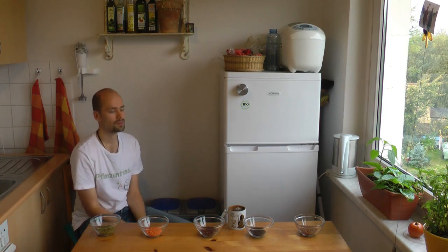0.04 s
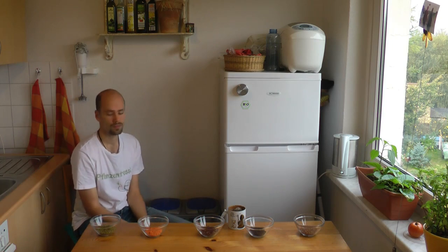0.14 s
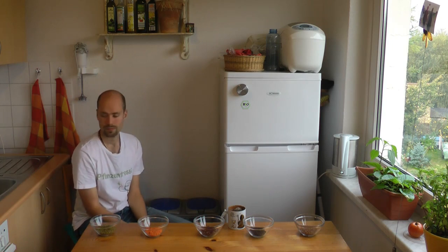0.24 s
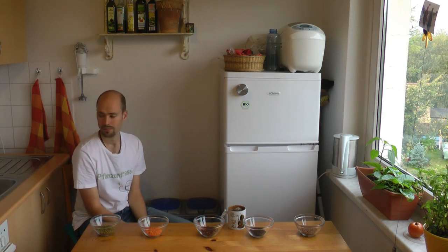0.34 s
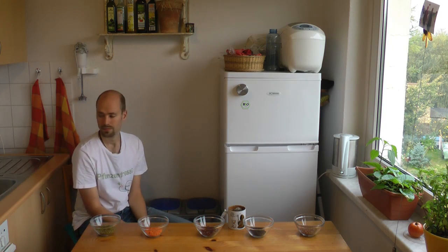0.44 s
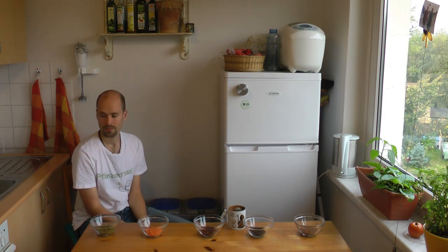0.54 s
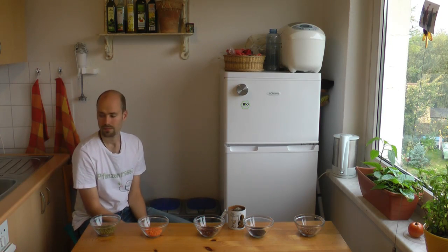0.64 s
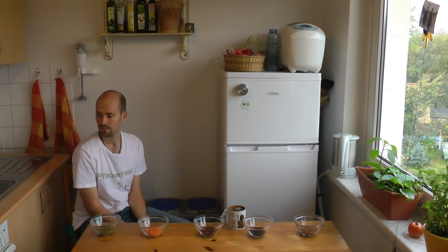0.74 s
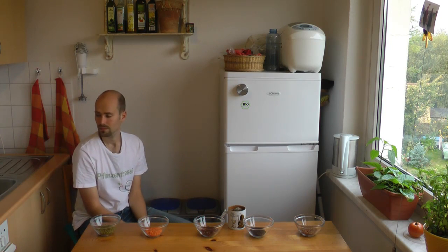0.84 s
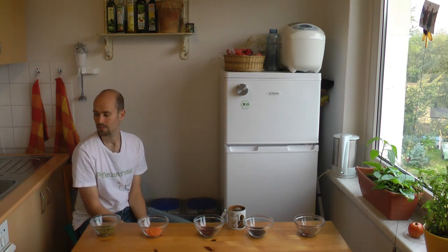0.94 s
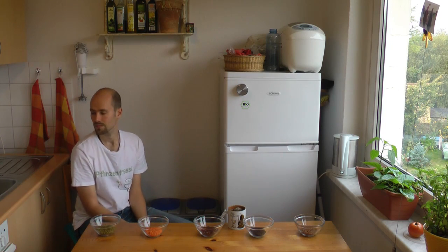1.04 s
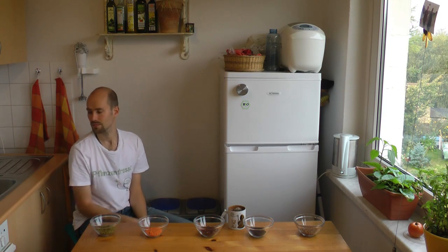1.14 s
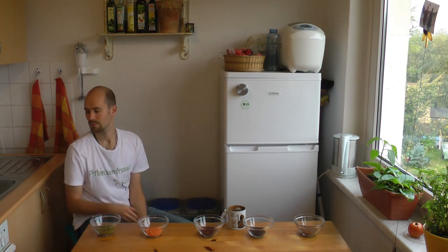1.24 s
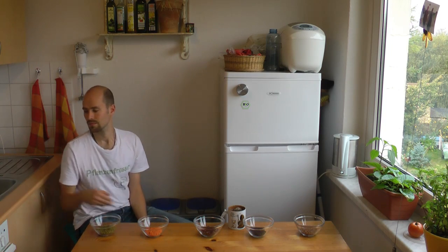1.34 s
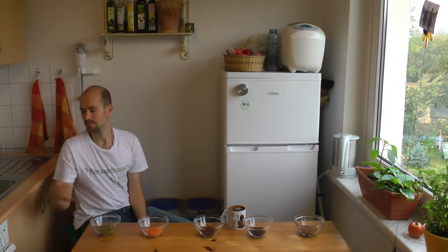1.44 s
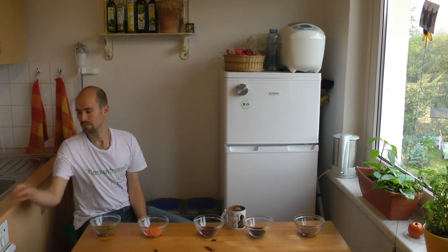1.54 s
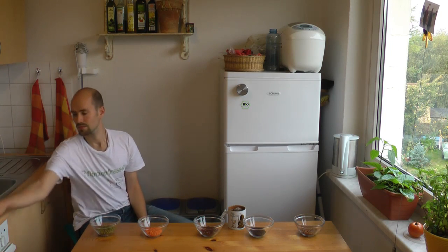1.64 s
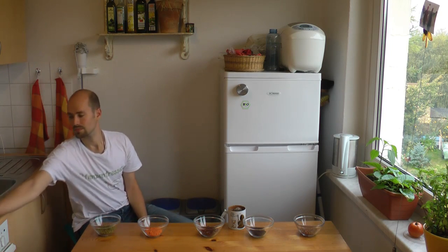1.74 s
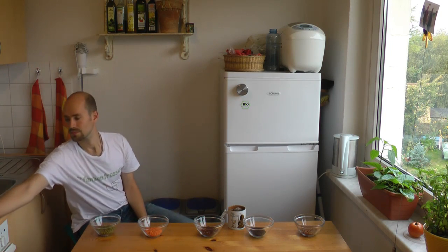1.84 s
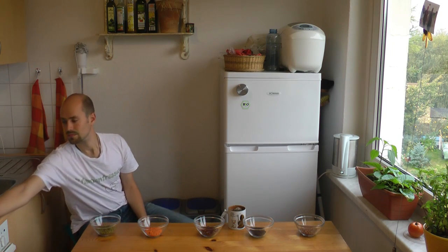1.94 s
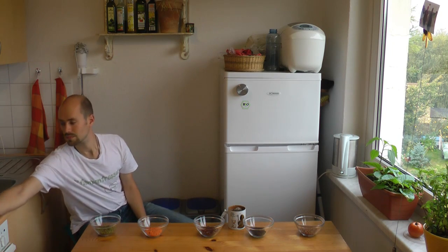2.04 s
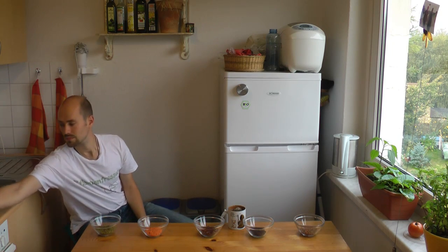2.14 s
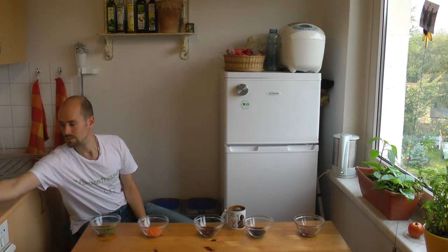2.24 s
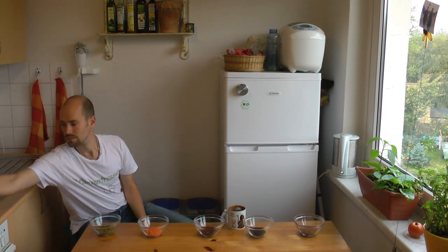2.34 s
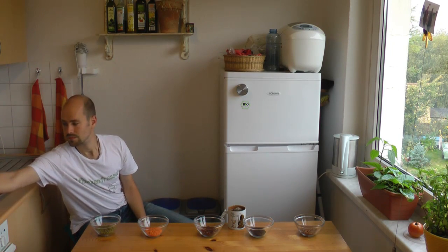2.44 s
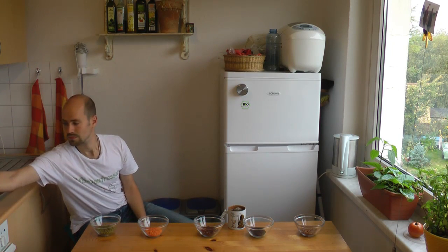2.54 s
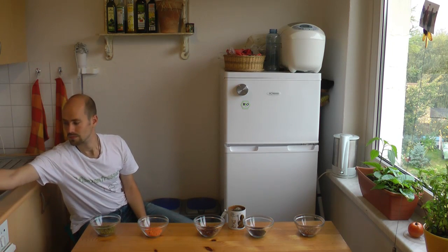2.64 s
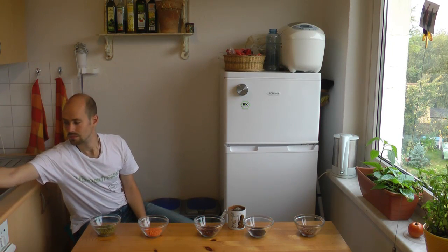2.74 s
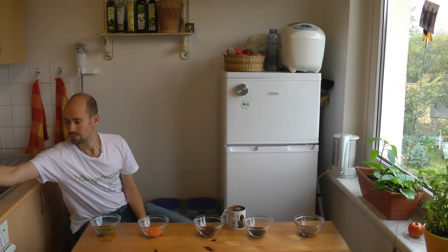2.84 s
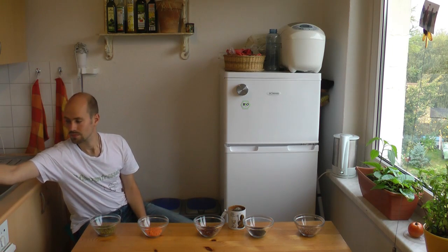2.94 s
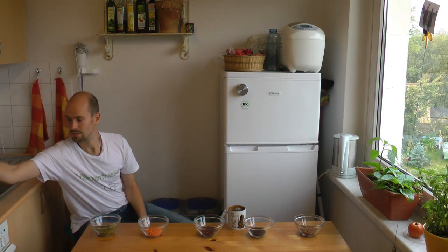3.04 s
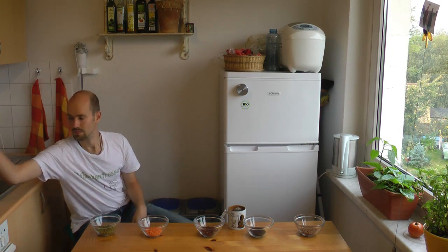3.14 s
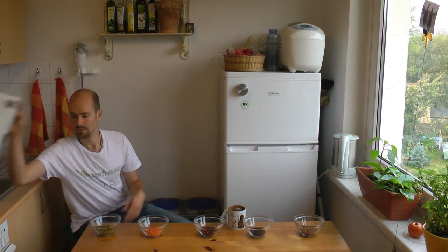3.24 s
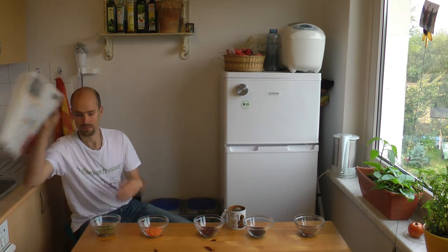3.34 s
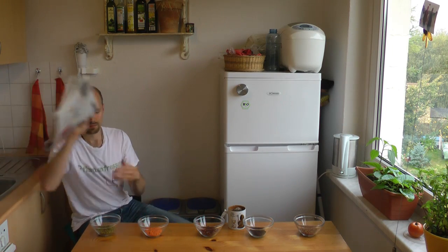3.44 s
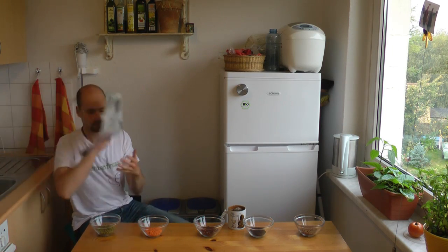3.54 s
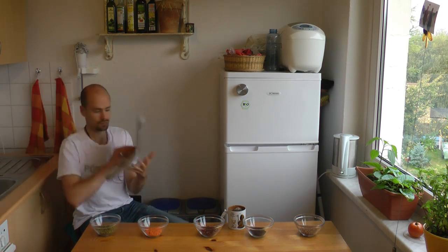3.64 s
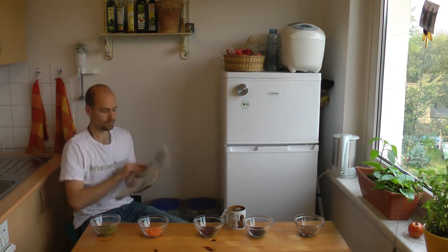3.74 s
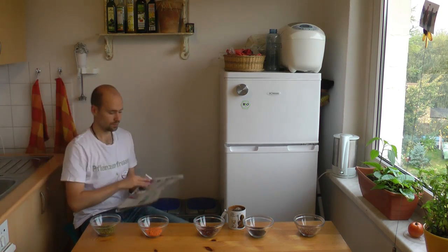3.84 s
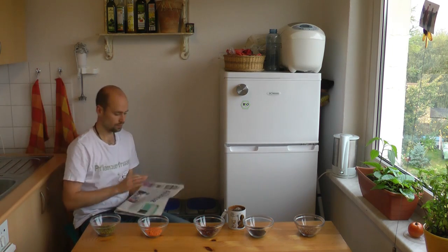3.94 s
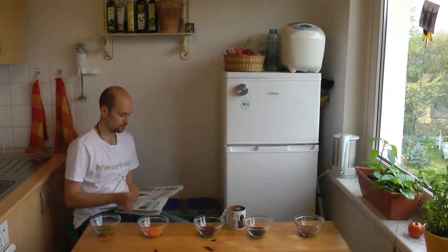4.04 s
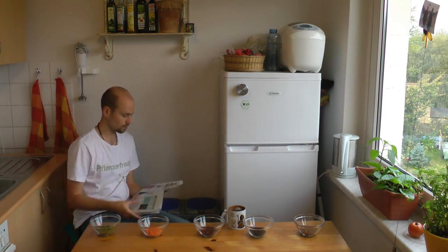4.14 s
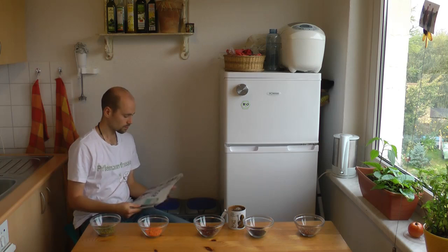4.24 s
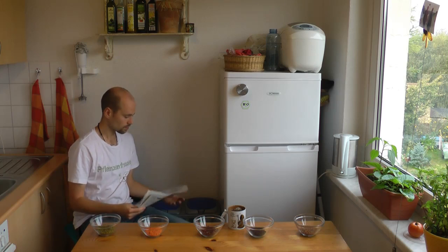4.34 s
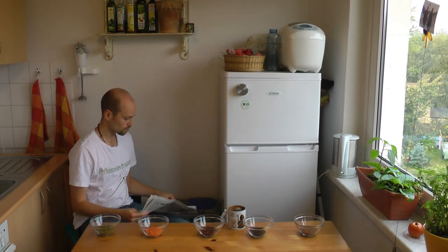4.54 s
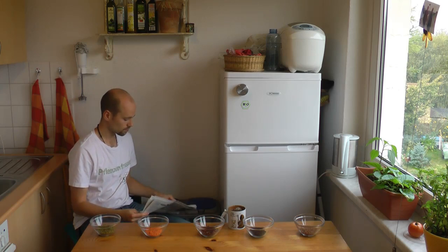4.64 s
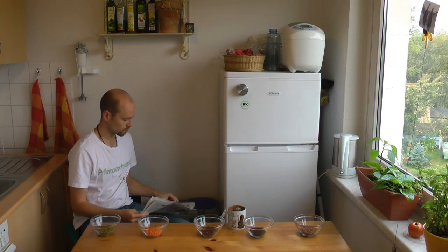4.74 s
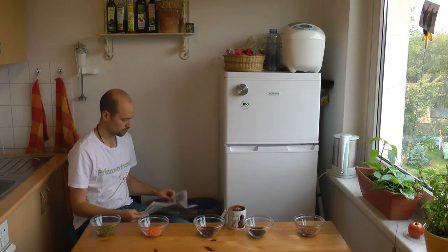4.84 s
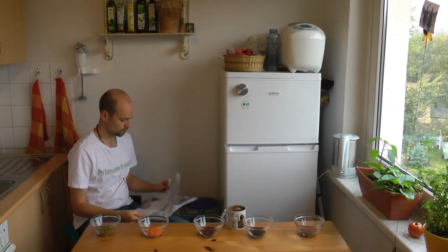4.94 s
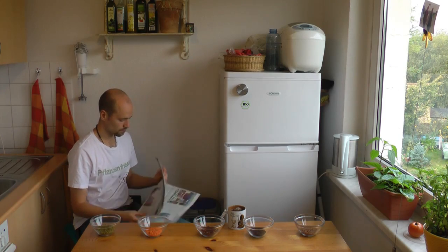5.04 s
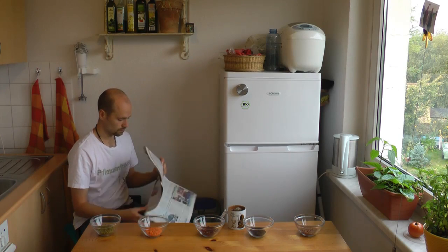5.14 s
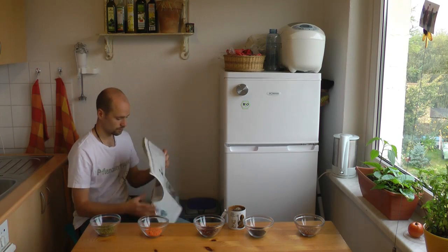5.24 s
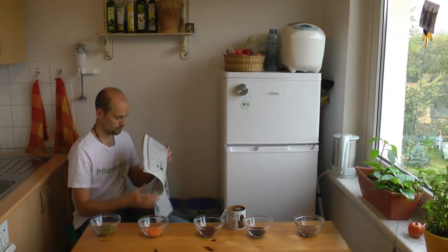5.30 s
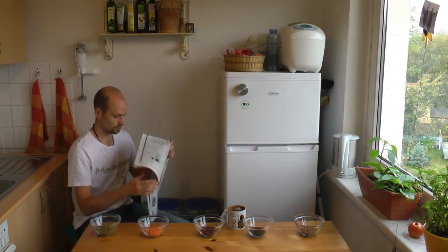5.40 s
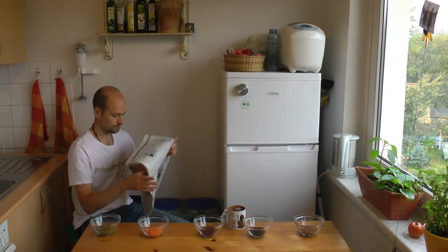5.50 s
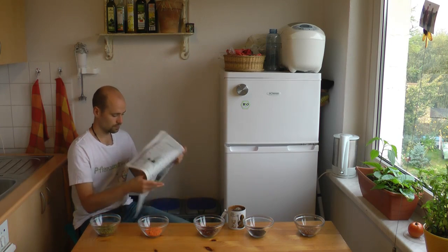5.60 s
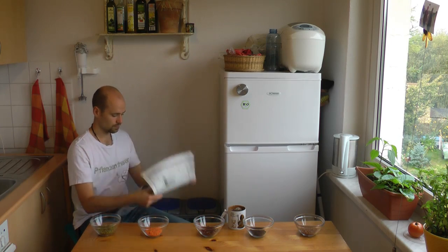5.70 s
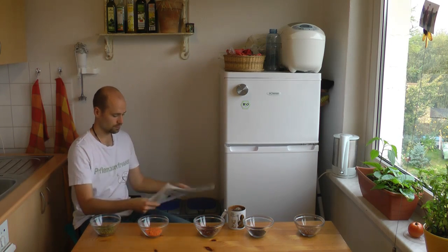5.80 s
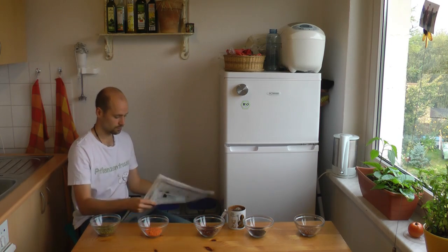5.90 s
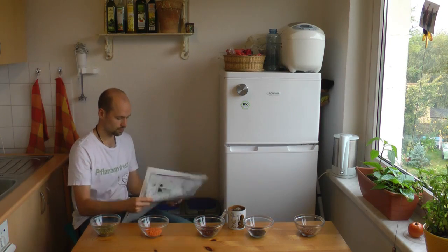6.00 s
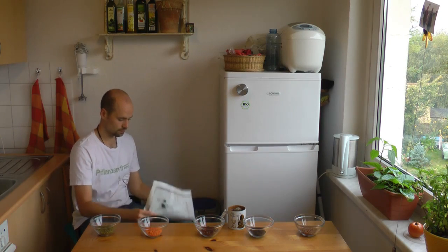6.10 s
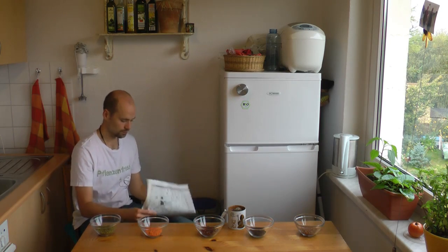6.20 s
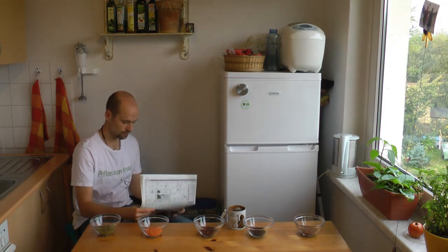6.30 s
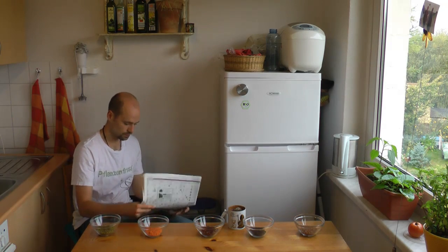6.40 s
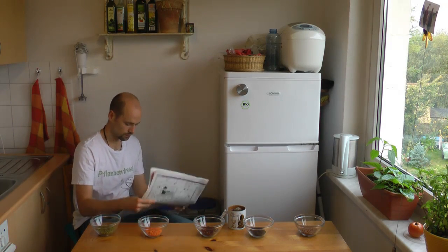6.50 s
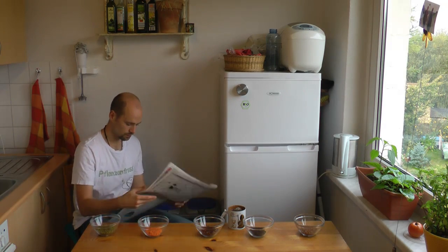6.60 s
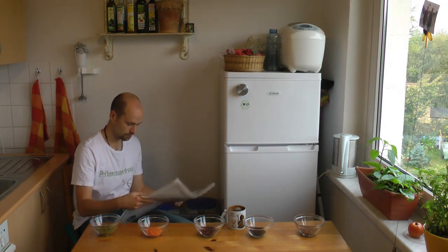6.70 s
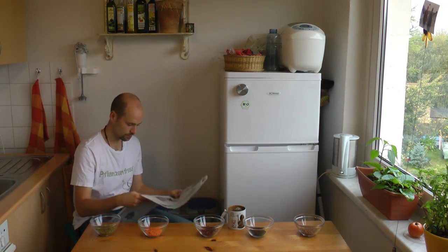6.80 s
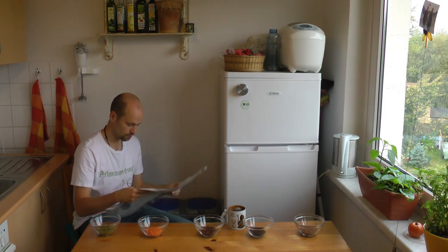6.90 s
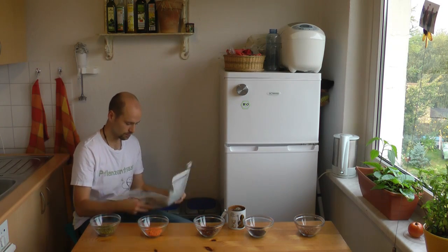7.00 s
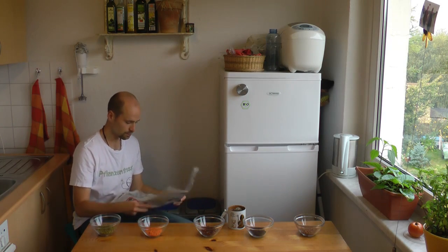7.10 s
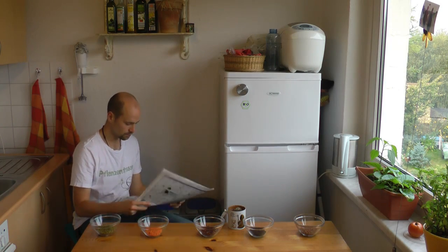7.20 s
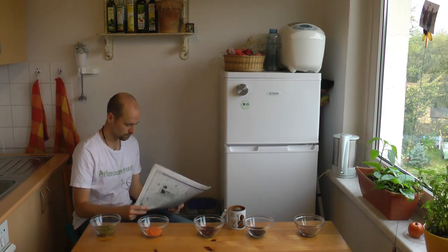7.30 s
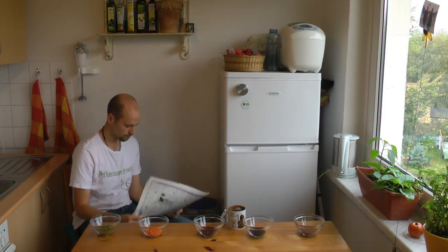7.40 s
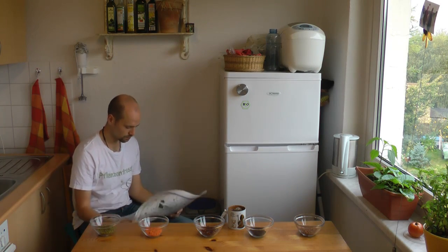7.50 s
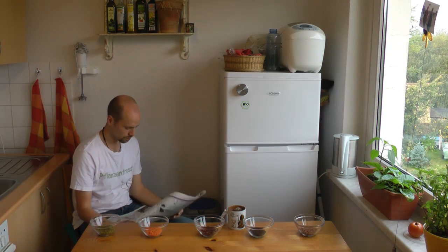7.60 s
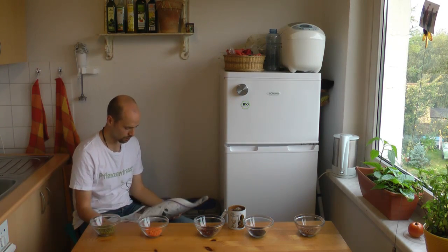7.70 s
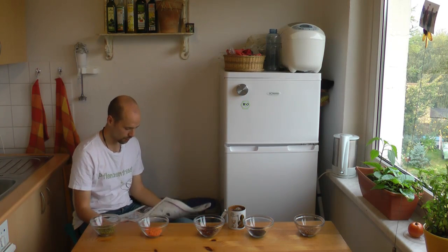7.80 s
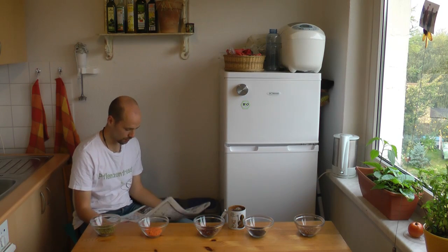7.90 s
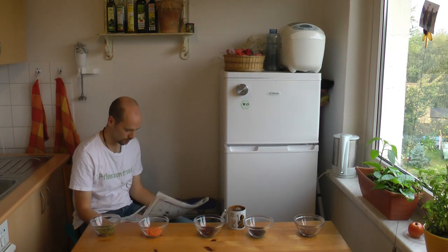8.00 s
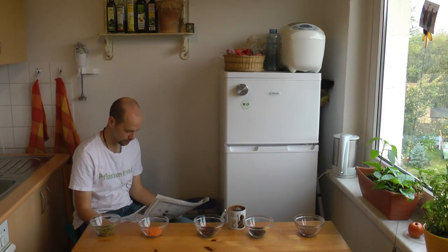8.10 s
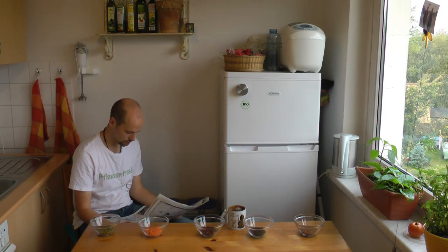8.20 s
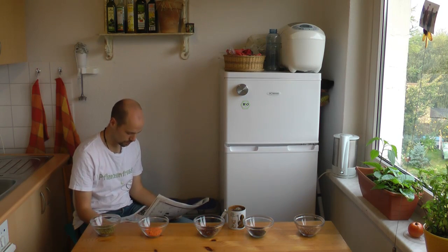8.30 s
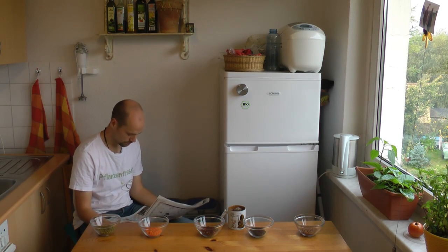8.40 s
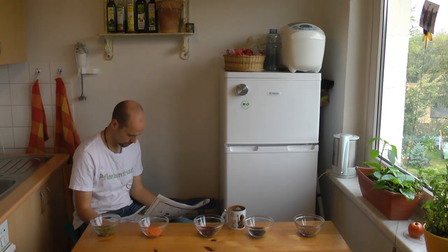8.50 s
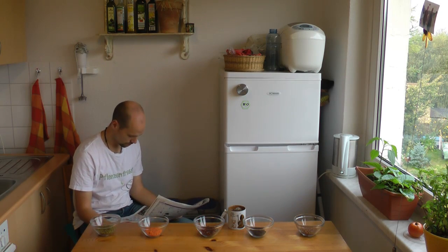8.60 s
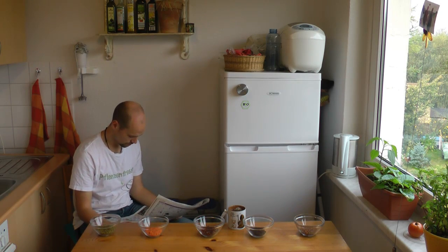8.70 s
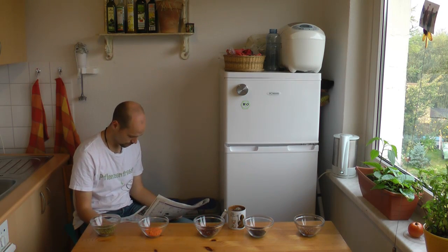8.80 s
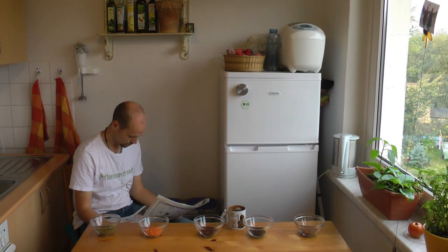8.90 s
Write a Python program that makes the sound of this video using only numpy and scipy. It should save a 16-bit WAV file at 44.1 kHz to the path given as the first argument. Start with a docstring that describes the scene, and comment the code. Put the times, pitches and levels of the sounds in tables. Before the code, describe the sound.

In a quiet echoing kitchen, a chair creaks, a newspaper slides off a counter with a thump, then is unfolded, shaken and turned with crisp crackles.

```python
"""A small, hard-walled kitchen: a man shifts on a creaking chair and slides a newspaper off the counter.
He unfolds it, turns it over, shakes it flat and lays it on his lap. Filtered noise and random clicks make
the paper and shirt, decaying sines the flip of a sheet, click-driven resonators the chair and counter.
Decaying noise gives strong echoes, as from across the table; tones and noise make the faint hum and hiss."""
import sys
import numpy as np
from scipy import signal
from scipy.fft import rfft, irfft, next_fast_len
from scipy.io import wavfile

SR = 44100
rng = np.random.default_rng(int(sys.argv[2]) if len(sys.argv) > 2 else 0)


def generate_wav(sig):
    """Save sig (samples, or channels by samples) to the path in sys.argv[1] as 16-bit PCM at SR."""
    pcm = np.round(np.clip(np.atleast_2d(sig).T, -1, 1) * 32767).astype(np.int16)
    wavfile.write(sys.argv[1], SR, pcm)


N = 394694
TIME = np.arange(N) / SR   # s

# Levels of man, paper, chair and counter are those before the room gains.
# Still kitchen air. Each row: frequency in Hz, relative power density in dB.
AIR_SPECTRUM = [(41, -28), (70, -8.5), (130, -7.5), (277, -12.5), (441, -11.5), (1370, -19.5), (3790, -25),
                (4050, -29.5), (5280, -24.5), (5640, -30), (11700, -32.5), (14000, -67)]
AIR_DB = -66.5   # rms
# Steady machine tones. Each row: frequency in Hz, level in dB rms.
HUM_TONES = [(25, -64.5), (50, -67.5), (150, -81), (3865, -85), (5152, -84.5)]
# Very faint hiss, drawn separately for left and right. Each row: frequency in Hz,
# relative power density in dB.
HISS_SPECTRUM = [(100, 0), (500, -8), (2000, -9.5), (5000, -3.5), (11500, -4.5), (13500, -15)]

# Shirt brushing as he moves. Each row: start in seconds, length in seconds, level in dB.
SHIRT_STROKES = [(-.025, 0.026, -44), (0.089, 0.13, -51.5), (0.302, 0.22, -66), (1.138, .12, -59),
                 (1.5, 0.45, -65)]
# Cotton. Each row: frequency in Hz, relative power density in dB.
CLOTH_SPECTRUM = [(410, -38), (700, -9.5), (851, -13), (894, -9), (1590, -1.5), (4070, -3.5), (8070, -10),
                  (13000, -29.5)]

# Weight shifting on the seat with a dull rub. Each row: time in seconds, level in dB.
SEAT_RUB = [(0, -64), (.25, -72.5), (.42, -68), (.62, -69), (.75, -90)]
# A chair joint creaks in a run of slips. Each row: start in seconds, length in seconds,
# first slip in dB re the chair modes, fall over the run in dB, brightness in dB per octave.
CREAK_RUNS = [(0.523, .055, -19, 4.5, 6), (1.415, .047, 5, 15, 0.5), (8.501, 0.1, -25.5, -2.5, 9)]
# Chair modes. Each row: frequency in Hz, strength in dB, T60 in seconds.
CHAIR_MODES = [(280, -41, 0.035), (460, -40, 0.028), (630, -42.5, 0.04), (769, -41, 0.058),
               (870, -40, 0.052), (1160, -34.5, 0.0074), (1497, -32.5, 0.023), (2220, -36, 0.011),
               (2400, -36.5, 0.012), (3170, -27.5, 0.0022), (5300, -74, 0.0018)]
SLIP_JITTER = 0.15   # unevenness of the slips, as a share of their spacing
# The joint sings as it slides. Each row: start in seconds, length in seconds, pitch in Hz,
# glide in Hz per second, level in dB.
SQUEAK_TONES = [(0.531, 0.043, 610, 1100, -54.5), (8.484, .13, 1545, 0, -63.5),
                (8.536, 0.037, 650, -2500, -62)]

# A hand slides or bends the sheets: dragged off the counter, caught in both hands, unfolded and turned,
# shaken flat and laid down. Each row: start in seconds, length in seconds, rustle in dB,
# flapping lows in dB re rustle, crisp highs in dB re rustle.
PAPER_STROKES = [ (1.878, 0.12, -52.5, -1, 3), (2.04, 0.3, -45.5, -8, 0), (2.18, 0.042, -45.5, -15, 10),
                 (2.368, 0.38, -47.5, -6, 0), (2.687, 0.11, -44.5, 0, 1.5), (2.796, .1, -36.5, -1, -2.5),
                 (3.055, 0.34, -58.5, -6, -2.5), (3.264, 0.54, -56.5, -6.5, -2),
                 (3.745, 0.15, -44, -3, -3.5), (3.908, 0.19, -56.5, 3.5, 3.5),
                 (4.181, 0.2, -42.5, -5.5, 1.5), (4.28, 0.033, -40.5, 4.5, 3),
                 (4.472, 0.44, -53.5, -1, 3.5), (4.938, 0.18, -45.5, -2, 1), (5.1, 0.24, -41, 0, -0.5),
                 (5.473, 0.3, -42, -0.5, -3.5), (5.716, .37, -39, -1, -1), (5.785, 0.083, -32, -0.5, 1),
                 (6.11, 0.089, -33.5, 4.5, -0.5), (6.285, 0.14, -43.5, 4, 5), (6.477, 0.15, -49, 5.5, 2.5),
                 (6.584, 0.069, -37.5, 1.5, 1), (6.703, 0.11, -51, 4.5, 2), (6.794, 0.23, -37, -0.5, -2),
                 (7.004, 0.048, -26.5, 0, -3.5), (7.065, 0.096, -35.5, -3, -5),
                 (7.214, 0.756, -48, 1.5, 0.5), (7.278, 0.027, -42, -7, -3), (7.888, 0.036, -47.5, -6, -6),
                 (8.003, 0.13, -57, 1, 0)]
# A fold gives way. Each row: time in seconds, level in dB, flapping lows in dB re level,
# crisp highs in dB re level.
FOLD_SNAPS = [(2.073, -32, -5, -1.5), (2.171, -45.5, -6, 12), (2.522, -38, -13, -17),
              (3.614, -41.5, -5, -5), (3.761, -38, 12, -3), (3.787, -27.5, -16, -14), (4.154, -43, 6, 1.5),
              (4.216, -37, -1.5, -2), (4.358, -37.5, -9, 11), (4.509, -47, 7, -6), (4.914, -32.5, -11, -4),
              (5.018, -29.5, -2.5, 3), (5.106, -29, -10, 6), (5.315, -36, -15, 7), (5.448, -38.5, -7, 7.5),
              (5.534, -32, -1, -5), (5.734, -30, -10, 4), (5.894, -35, 10, 1), (6.111, -29, 9.5, 7),
              (6.136, -24.5, -12, 6), (6.418, -40, 2, 10), (6.584, -37.5, 11.5, 11), (6.862, -33.5, -6, 6),
              (7.036, -19.5, 5, 4), (7.448, -37.5, 0, 0), (7.506, -37, -6, 5.5), (7.732, -31, 1.5, 0.5),
              (7.837, -42, -9, -10), (7.919, -41.5, -1, 3.5), (8.233, -48, 8, 0)]
# Newsprint. Each row: frequency in Hz, relative power density in dB.
PAPER_SPECTRUM = [(65, -65), (110, -27), (149, -23.5), (263, -13.5), (371, -4.5), (464, -6), (514, -6.5),
                  (740, -4.5), (1440, -4), (1730, -2.5), (4880, -8), (8780, -15.5), (14000, -32)]
FLAP_HZ, CRISP_HZ = 900, 4000   # borders of the three paper registers
ATTACK_S, SLACKEN_DB_PER_S, RELEASE_S = 0.018, 2.5, 0.032   # paper; the slackening serves all strokes
SNAP_FADE_S = 0.012   # time constant of the burst of buckles after each snap
# A bellied sheet flips through or the bundle flops on a hand. Each row: start in seconds, pitch in Hz,
# envelope peak in dB, time constant in seconds.
SHEET_POPS = [(2.523, 1680, -33.5, .0008), (3.7615, 1660, -22, 0.00056), (5.238, 944, -34.5, 0.0023),
              (5.54, 1880, -27, .0007), (5.655, 784, -33.5, 0.0035), (6.216, 385, -34, 0.0027),
              (6.221, 605, -27.5, 0.003), (6.243, 609, -33, 0.003), (7.034, 363, -21, 0.0021),
              (7.038, 140, -36, 0.003), (7.052, 370, -27.5, 0.0028), (7.893, 1300, -31.5, 0.001)]

# Blows on the counter. Each row: time in seconds, level in dB re the counter modes,
# brightness in dB per octave.
COUNTER_BLOWS = [(2.7930, 1, -1), (2.7995, -20, -2), (2.819, -10, -2.5), (2.839, -13, -6)]
# Counter modes. Each row: frequency in Hz, strength in dB, T60 in seconds.
COUNTER_MODES = [(115, -46, 0.092), (248, -27.5, 0.052), (286.5, -23.5, 0.083), (380, -25.5, 0.038),
                 (429, -28.5, 0.13), (515, -21, 0.041), (650, -21, 0.029), (807, -23.5, 0.051),
                 (1190, -24.5, 0.014), (1800, -20, 0.014), (2170, -26.5, 0.018)]

# Reverberation. Each row: frequency in Hz, T60 in seconds.
ROOM_T60 = [(150, 0.51), (500, 0.48), (1500, 0.47), (4000, 0.52), (8000, 0.45), (13000, 0.19)]
CUTOFF_HZ = 14200


def from_db(db):
    """Decibels to gain."""
    return 10 ** (np.asarray(db) / 20)


def at_hz(points, hz):
    """Read a table on a log-frequency axis."""
    table_hz, value = np.transpose(points)
    return np.interp(np.log(np.maximum(hz, 1)), np.log(table_hz), value)


def colour(x, spectrum, weight=np.ones_like, size=4096):
    """Causal filter of unit power gain with the given spectrum; weight(hz) then keeps a part of it."""
    hz = np.fft.rfftfreq(size, 1 / SR)
    gain = from_db(at_hz(spectrum, hz))
    gain = gain / np.sqrt(np.mean(gain ** 2)) * weight(hz)
    # folding the cepstrum gives minimum phase
    cepstrum = irfft(np.log(gain + 1e-7))
    cepstrum[1:size // 2] *= 2
    cepstrum[size // 2 + 1:] = 0
    impulse_response = irfft(np.exp(rfft(cepstrum)))
    return signal.oaconvolve(x, impulse_response)[:N]


def wander(per_s):
    """Straight lines between random values of spread 1."""
    knots = rng.standard_normal(N // 100)
    return np.interp(TIME * per_s, np.arange(len(knots)), knots)


def flutter(depth_db, per_s):
    """A gain that wanders at random."""
    return from_db(depth_db * wander(per_s))


def stroke(start_s, length_s, attack_s, release_s):
    """Envelope of one movement: it gathers speed, slackens a little and dies away."""
    age = np.maximum(TIME - start_s, 0)
    fall = np.maximum(age - length_s, 0) / release_s
    rise = np.minimum(age / attack_s, 1)
    return rise * from_db(-SLACKEN_DB_PER_S * age) * np.exp(-np.minimum(fall, 20))


def crackle(per_s, spread_db, hiss_share):
    """Tiny buckles of uneven size at random moments, over the hiss of rubbing fibres; rms 1."""
    sizes = from_db(spread_db * np.minimum(rng.exponential(1, N), 4))
    signed_sizes = sizes * rng.choice([-1, 1], N)
    grains = signed_sizes * (rng.random(N) < per_s / SR)
    share = np.clip(hiss_share, 0, 1)
    return np.sqrt(1 - share) * grains / grains.std() + np.sqrt(share) * rng.standard_normal(N)


def clicks(rows):
    """One impulse for each row: time in seconds, level in dB."""
    out = np.zeros(N)
    for s, db in rows:
        out[round(s * SR)] += from_db(db)
    return out


def ring(x, hz, t60_s):
    """Resonator: a unit click starts a decaying sine of initial height 1."""
    r = from_db(-60 / (t60_s * SR))
    w = 2 * np.pi * hz / SR
    return signal.lfilter([0, np.sin(w)], [1, -2 * r * np.cos(w), r * r], x + 1e-18)


def wood(blows, modes, contact):
    """Each blow rings all modes, tilted by its brightness; contact(clicks) turns the blows into a force."""
    s, level_db, brightness = np.transpose(blows)
    out = 0
    for k, (hz, mode_db, t60_s) in enumerate(modes):
        strength_db = level_db + mode_db + brightness * np.log2(hz / 1000)
        force = contact(clicks(zip(s, strength_db)))
        out = out + (-1) ** k * ring(force, hz, t60_s)
    return out


def background():
    """Steady hiss and a low machine hum, with faint high tones."""
    hum = 0
    for hz, db in HUM_TONES:
        phase = 2 * np.pi * (hz * TIME + rng.random())
        hum = hum + from_db(db) * np.sqrt(2) * np.sin(phase)
    return hum + from_db(AIR_DB) * colour(rng.standard_normal(N), AIR_SPECTRUM)


def side_hiss(level_db):
    """Very faint hiss, drawn separately for left and right."""
    return from_db(level_db) * np.array([colour(rng.standard_normal(N), HISS_SPECTRUM) for _ in range(2)])


def shirt(attack_s=0.028, release_s=0.028):
    """Cotton brushes in soft, fine-grained strokes."""
    brushing = 0
    for start_s, length_s, db in SHIRT_STROKES:
        brushing = brushing + from_db(db) * stroke(start_s, length_s, attack_s, release_s)
    grain = crackle(per_s=10000, spread_db=9.0, hiss_share=0.99)
    return colour(brushing * grain, CLOTH_SPECTRUM)


def seat(hz=340, t60_s=0.015):
    """Shifting weight rubs dully: noise through two resonators in series."""
    noise = np.diff(rng.standard_normal(N + 1))
    rub = ring(ring(noise, hz, t60_s), hz, t60_s / 2)
    level_db = np.interp(TIME, *np.transpose(SEAT_RUB), right=-120)
    return rub / rub.std() * from_db(level_db)


def slips(count):
    """Each creak is a run of unevenly spaced slips of changing force: time s, level dB, brightness."""
    rows = []
    for start_s, length_s, db, fall_db, brightness in CREAK_RUNS:
        jitter = np.r_[0, SLIP_JITTER * rng.standard_normal(count - 1)]
        progress = (np.arange(count) + jitter) / (count - 1)
        rows += [(start_s + length_s * p, db - fall_db * p, brightness) for p in progress]
    return rows


def creaks(slip_s=0.0032):
    """A joint grates in jerks that decay over a few milliseconds and drive the chair modes."""
    power_decay = np.exp(-2 / (slip_s * SR))
    grit = crackle(per_s=3600, spread_db=-0.5, hiss_share=0.26)

    def grate(jerks):
        """Each jerk becomes a decaying burst of grit."""
        power = signal.lfilter([1 - power_decay], [1, -power_decay], jerks ** 2 + 1e-30)
        return grit * np.sqrt(power)

    band = signal.butter(2, [220, 6000], "band", fs=SR, output="sos")
    return signal.sosfilt(band, wood(slips(count=6), CHAIR_MODES, grate))


def squeaks(attack_s=0.009, release_s=0.014, waver_hz=35):
    """Short, unsteady tones of a sliding joint, some gliding."""
    out = 0
    for start_s, length_s, hz, glide, db in SQUEAK_TONES:
        pitch_hz = hz + glide * np.clip(TIME - start_s, 0, length_s) + waver_hz * wander(per_s=200)
        tone = np.sin(2 * np.pi * np.cumsum(pitch_hz) / SR)
        out = out + from_db(db) * stroke(start_s, length_s, attack_s, release_s) * tone
    return out


def chair():
    """Seat rub, grating joint and its brief singing."""
    return seat() + creaks() + squeaks()


def flap_register(hz):
    """Whole sheets: the lows."""
    return 1 / np.sqrt(1 + (hz / FLAP_HZ) ** 6)


def rustle_register(hz):
    """Folds: the middle."""
    return 1 / np.sqrt((1 + (FLAP_HZ / (hz + 1)) ** 6) * (1 + (hz / CRISP_HZ) ** 6))


def crisp_register(hz):
    """Small creases: the highs."""
    return 1 / np.sqrt(1 + (CRISP_HZ / (hz + 1)) ** 6)


def newspaper(rub_db=0.0, crease_db=-7.5, snap_db=0.5, crack_db=12.0):
    """Rubbing and bursts of buckles sound in three registers: sheets flap, folds rustle, creases are crisp."""
    efforts = np.array([stroke(start_s, length_s, ATTACK_S, RELEASE_S) ** 2
                        for start_s, length_s, *_ in PAPER_STROKES])
    _, _, level_db, lows_db, highs_db = np.transpose(PAPER_STROKES)
    rub = from_db(rub_db) * crackle(per_s=1100, spread_db=4.0, hiss_share=0.26)
    rub = rub * flutter(depth_db=1.5, per_s=63)
    # single creases stand out
    rub = rub + from_db(crease_db) * crackle(per_s=130, spread_db=2.5, hiss_share=0)
    burst = from_db(snap_db) * crackle(per_s=3500, spread_db=4.0, hiss_share=0.067)
    age = TIME[:SR // 4]
    snap_fade = np.exp(-age / SNAP_FADE_S)
    registers = [flap_register, rustle_register, crisp_register]
    out = 0
    for k, (register, tilt_db) in enumerate(zip(registers, (lows_db, 0, highs_db))):
        # overlapping strokes add in power
        force = rub * np.sqrt(from_db(level_db + tilt_db) ** 2 @ efforts)
        # the colour shifts as different parts of the sheet move
        force *= flutter(depth_db=1.4, per_s=55)
        for start_s, db, low_db, high_db in FOLD_SNAPS:
            i = round(start_s * SR)
            height = from_db(db + (low_db, 0, high_db)[k])
            force[i:i + len(age)] += height * snap_fade * burst[i:i + len(age)]
            force[i] += height * from_db(crack_db)   # the first, largest buckle
        # each buckle pushes the air either way in each register
        out = out + colour(force * rng.choice([-1, 1], N), PAPER_SPECTRUM, register)
    return out


def pops():
    """The air held by a curved sheet swells and rings for a few cycles as the sheet flips."""
    out, age = np.zeros(N), TIME[:SR // 10]
    for s, hz, db, fade_s in SHEET_POPS:
        i = round(s * SR)
        swell = age / fade_s * np.exp(1 - age / fade_s)
        out[i:i + len(age)] += from_db(db) * swell * np.sin(2 * np.pi * hz * age)
    return signal.sosfilt(signal.butter(2, 120, "high", fs=SR, output="sos"), out)


def counter(slap_db=-28.0, slap_s=0.014):
    """The board thumps under clean blows, and the paper on it slaps at the first."""
    age = TIME - COUNTER_BLOWS[0][0]
    fade = (age > 0) * np.exp(-np.abs(age) / slap_s)
    slap = from_db(slap_db) * fade * crackle(per_s=2500, spread_db=7.5, hiss_share=0.15)
    thump = wood(COUNTER_BLOWS, COUNTER_MODES, contact=lambda blows: blows)
    return thump + colour(slap, PAPER_SPECTRUM)


def echoes(first_echo_s=0.002):
    """Dense wall echoes along one set of paths, dying band by band; unit energy."""
    age, hz = TIME[:SR], np.fft.rfftfreq(SR, 1 / SR)
    white, tail = rfft(rng.standard_normal(SR)), 0
    edges_hz = np.r_[0, np.geomspace(180, SR / 2, 20)]
    for low, high in zip(edges_hz, edges_hz[1:]):
        band = irfft(white * ((hz >= low) & (hz < high)), SR) * (age > first_echo_s)
        band = band * from_db(-60 * age / at_hz(ROOM_T60, (low + high) / 2))
        tail = tail + band * np.sqrt((high - low) / (SR / 2) / np.sum(band ** 2))
    return tail


def kitchen(x, direct_db, room_db, shifts_per_s, count):
    """Direct sound plus echoes; a moving source shifts its power and phase among several sets of paths."""
    shares = np.array([wander(shifts_per_s) for _ in range(count)])
    shares /= np.sqrt(np.sum(shares ** 2, axis=0))
    size = next_fast_len(N + SR)
    spectrum = sum(rfft(x * share, size) * rfft(echoes(), size) for share in shares)
    room = irfft(spectrum, size)[:N]
    return from_db(direct_db) * x + from_db(room_db) * room


def scene(hiss_db=-77.5):
    """All sounds reach one microphone, alike in both channels but for a trace of hiss."""
    man_and_paper = shirt() + chair() + newspaper() + pops()
    man = kitchen(man_and_paper, direct_db=-5.0, room_db=-1.5, shifts_per_s=45, count=6)
    thump = kitchen(counter(), direct_db=1.0, room_db=1.0, shifts_per_s=12, count=2)
    return background() + man + thump + side_hiss(hiss_db)


def record(dry):
    """The top is cut steeply."""
    return signal.sosfilt(signal.ellip(10, .2, 80, CUTOFF_HZ, fs=SR, output="sos"), dry)


dry = scene()
out = record(dry)
generate_wav(out)
```